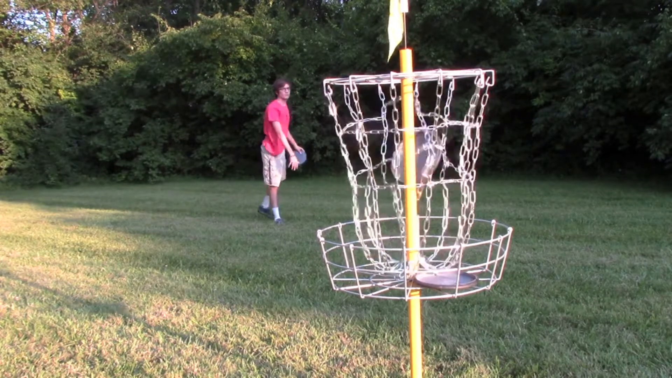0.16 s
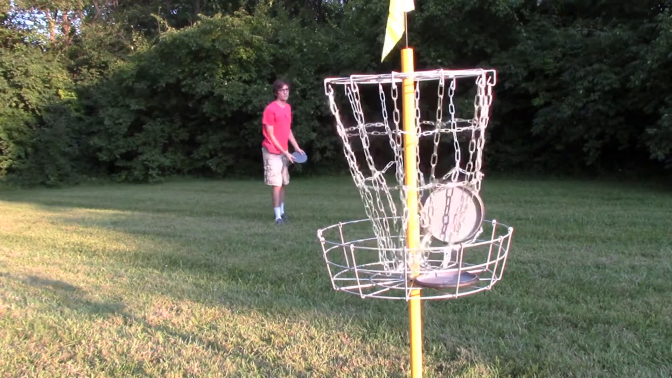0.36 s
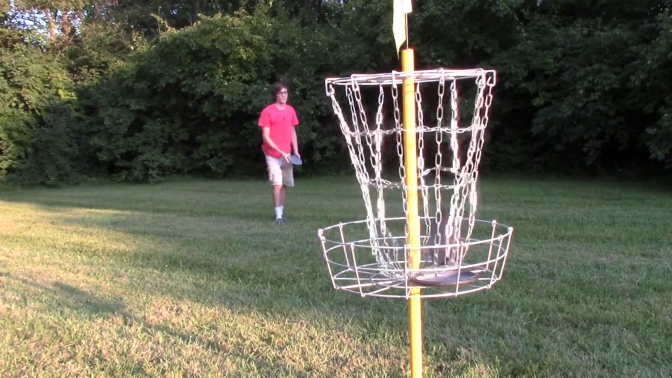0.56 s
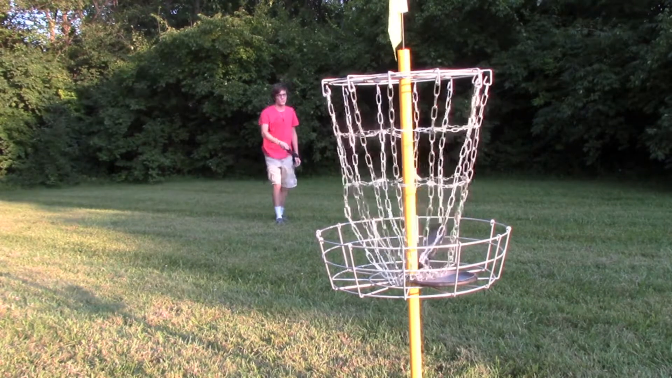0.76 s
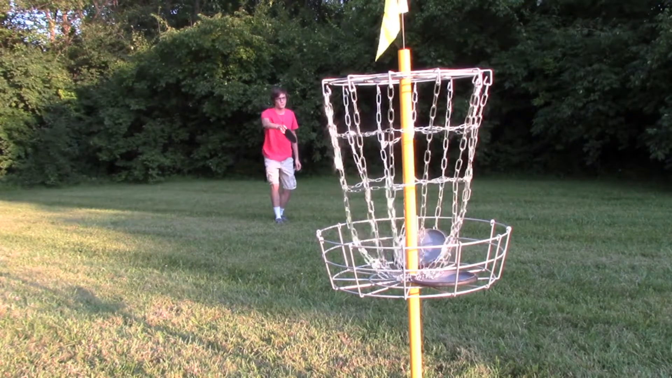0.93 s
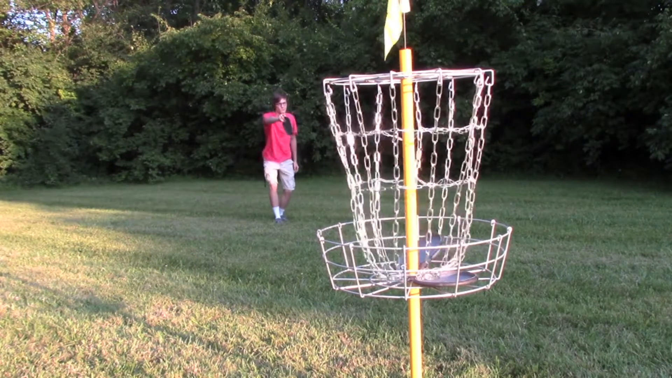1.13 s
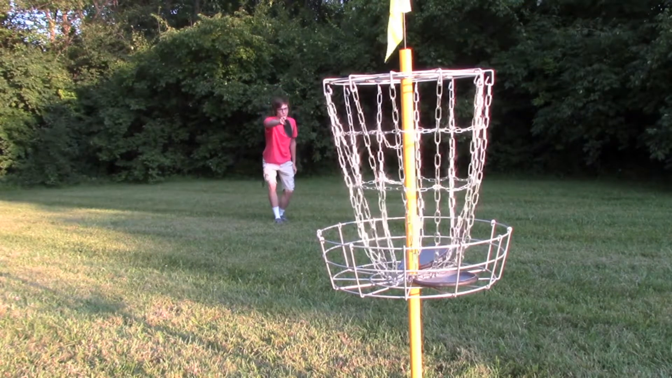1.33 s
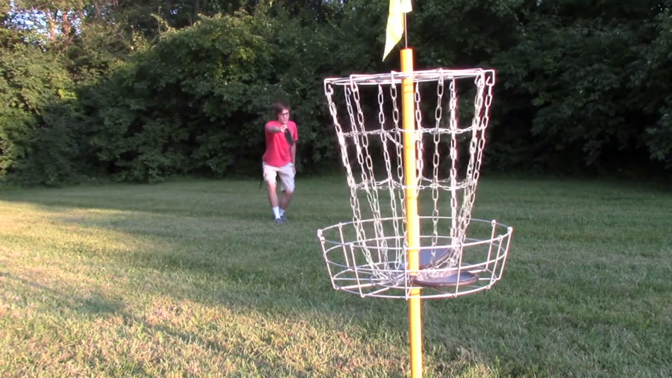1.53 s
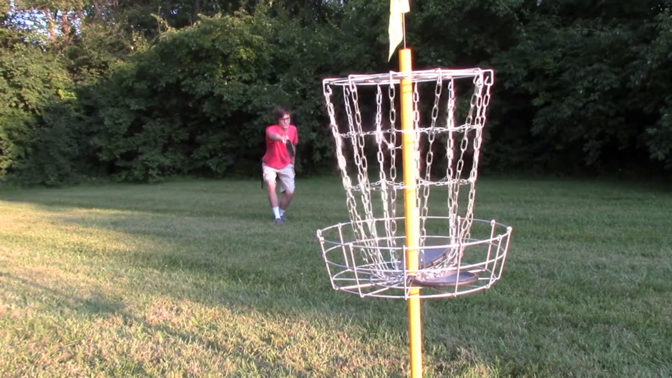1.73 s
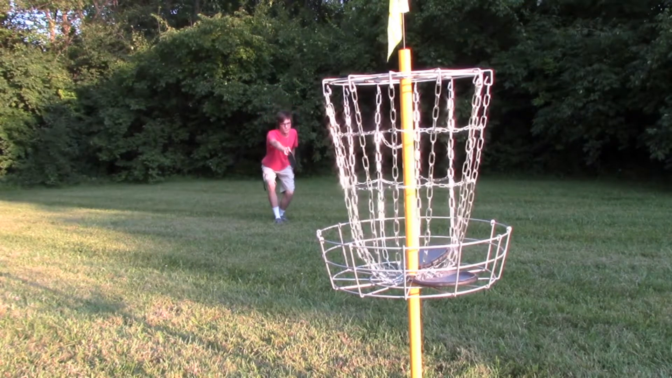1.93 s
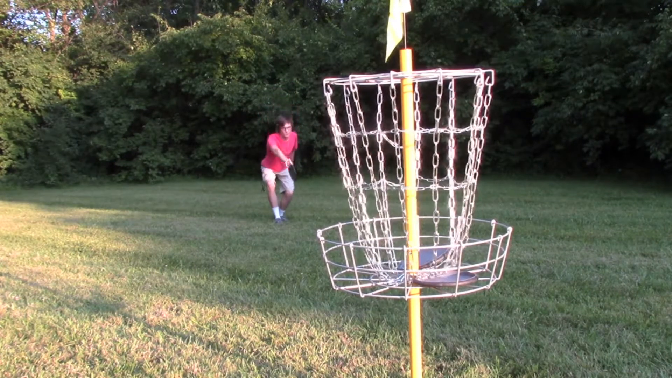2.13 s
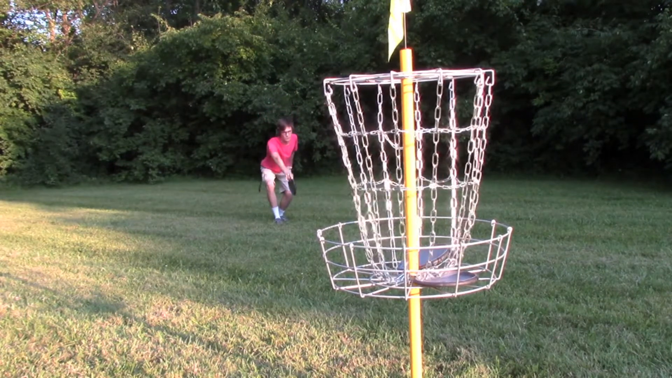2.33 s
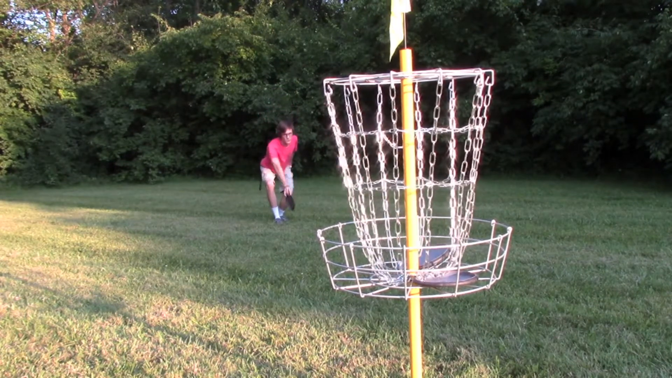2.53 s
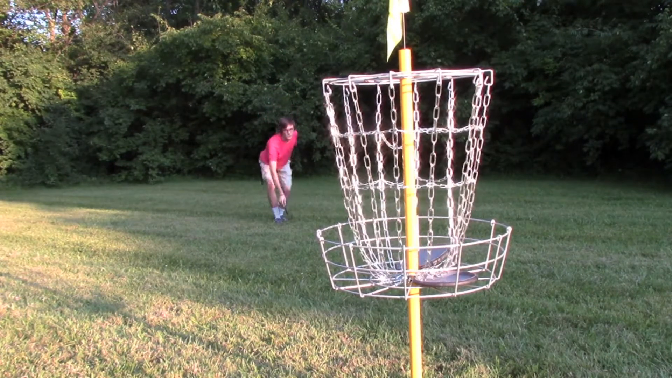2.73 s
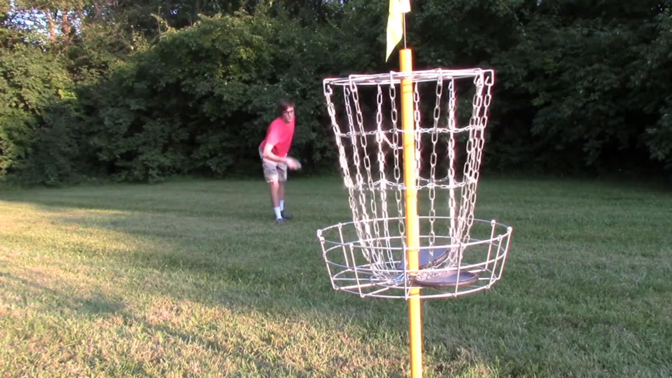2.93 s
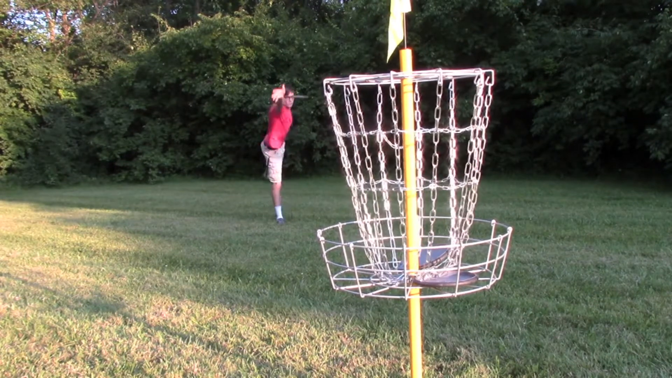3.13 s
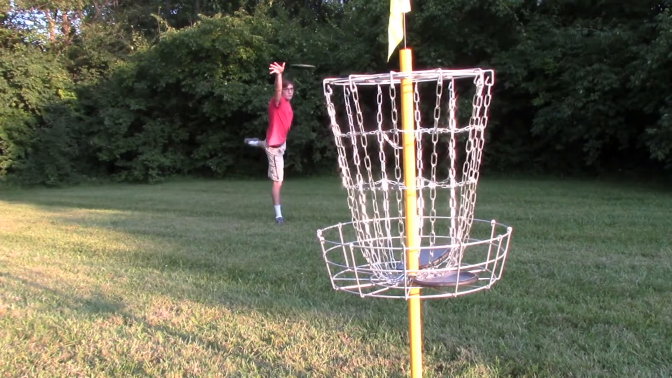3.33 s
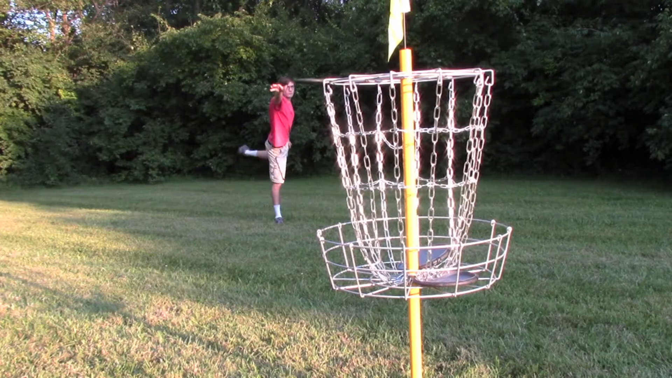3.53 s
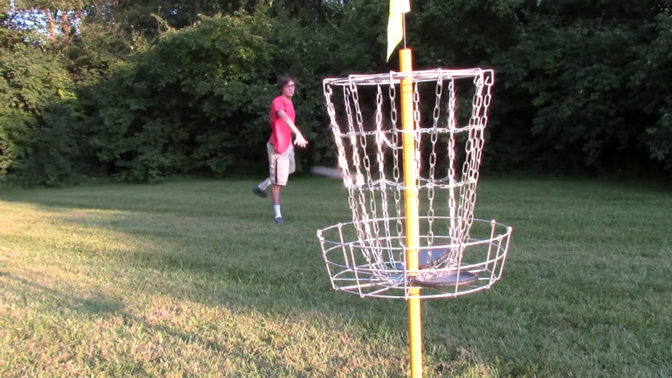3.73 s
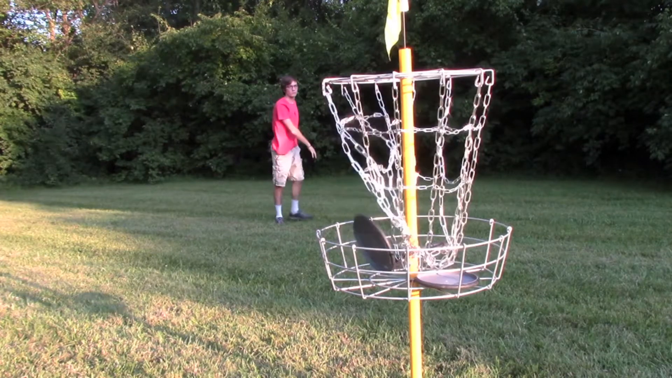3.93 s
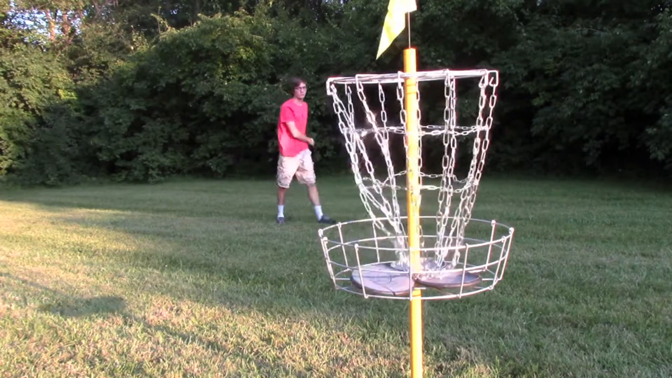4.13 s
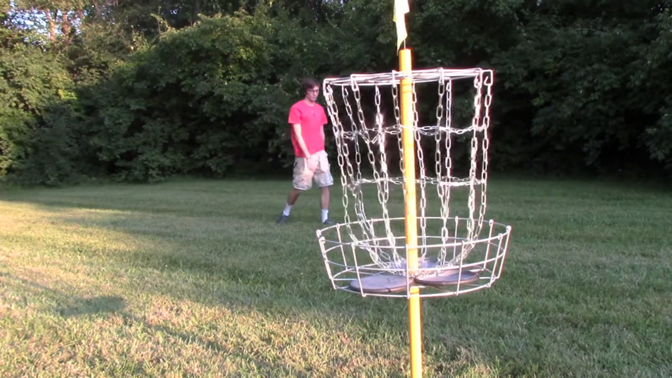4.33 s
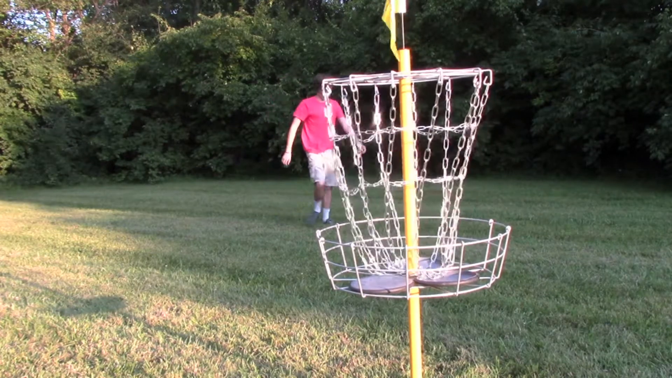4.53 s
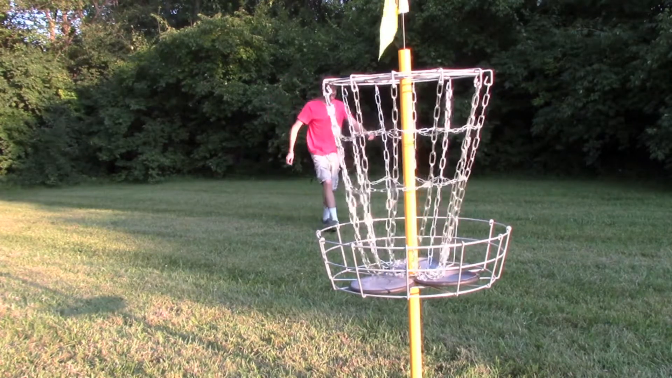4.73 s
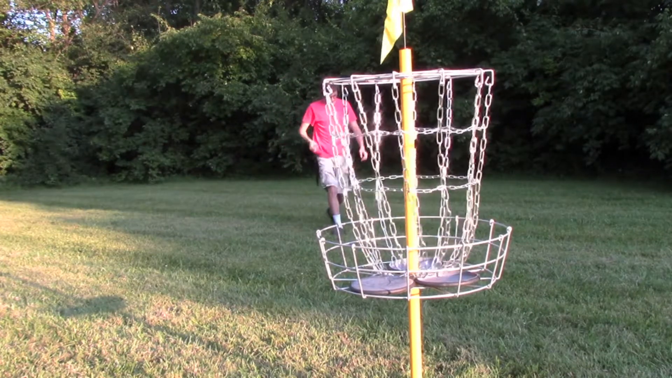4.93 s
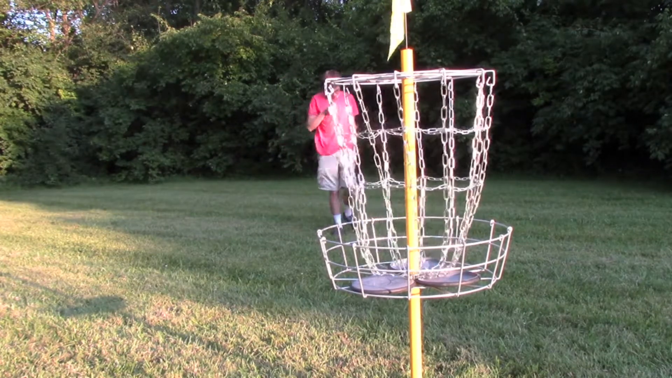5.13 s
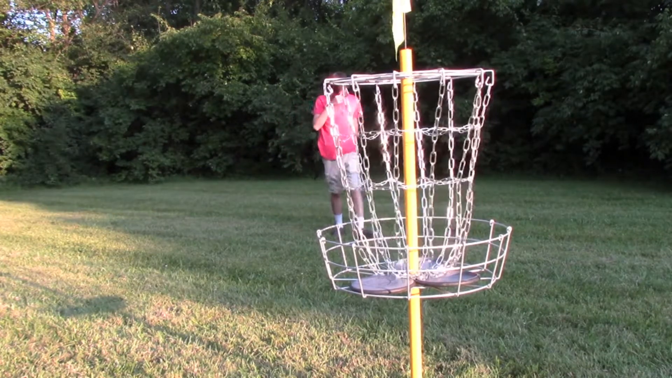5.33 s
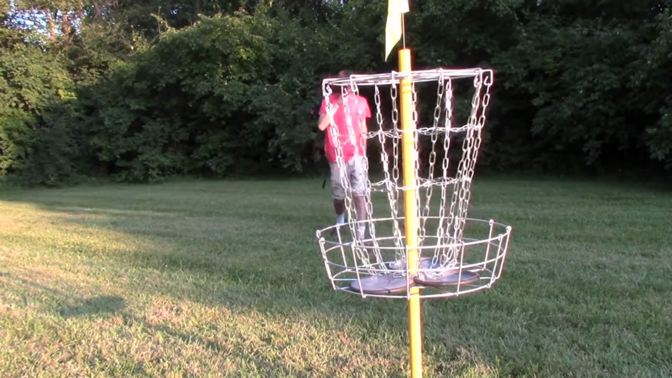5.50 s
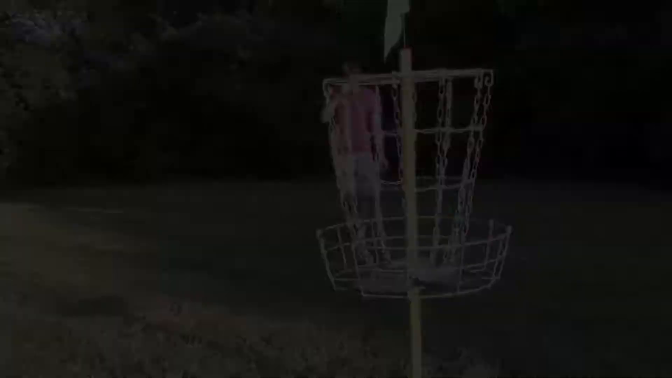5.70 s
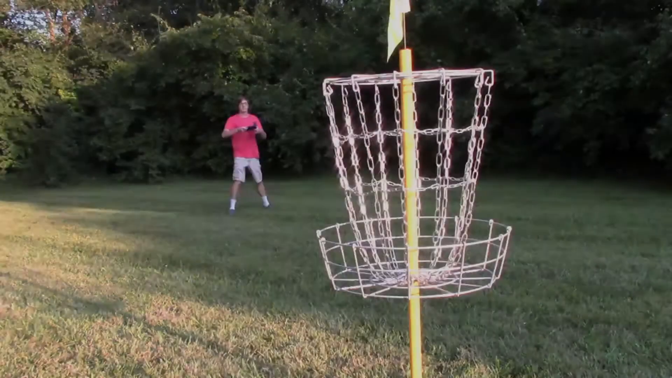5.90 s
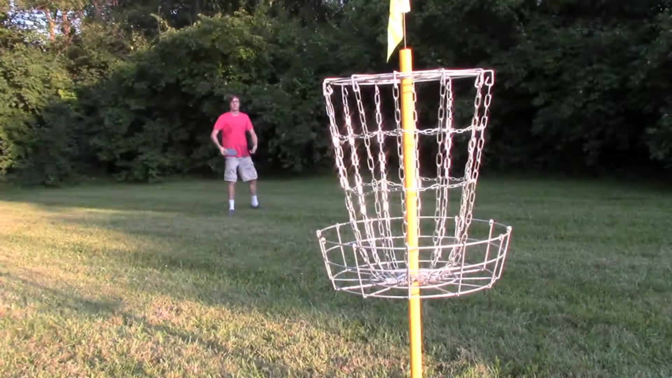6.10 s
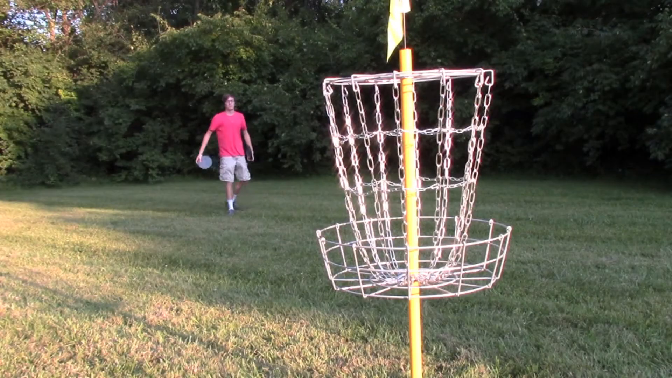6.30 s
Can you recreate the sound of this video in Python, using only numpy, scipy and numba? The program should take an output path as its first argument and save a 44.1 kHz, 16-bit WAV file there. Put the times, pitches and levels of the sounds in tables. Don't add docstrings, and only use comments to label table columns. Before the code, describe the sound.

A plastic disc crashes into hanging steel chains, which ring and clink away; seconds later a second crash follows, over steady insect buzz outdoors.

```python
import sys
import numpy as np
from scipy import signal
from scipy.fft import rfft, irfft
from scipy.io import wavfile
from scipy.ndimage import uniform_filter1d
from numba import njit

SR = 44100
rng = np.random.default_rng(int(sys.argv[2]) if len(sys.argv) > 2 else 0)


def voltage_ratio(decibels):
    exponent = np.asarray(decibels, float) / 20
    return 10 ** exponent


def unload_audio(sound):
    columns = np.transpose(np.atleast_2d(sound))
    steps = np.round(np.clip(columns, -1, 1) * 32767)
    wavfile.write(sys.argv[1], SR, steps.astype(np.int16))


N = 284877
T = np.arange(N) / SR
BOTH, APART = np.array([[1], [1]]), np.array([[1], [-1]])

# (time [s], link peak [dB], hoop middle [dB], hoop high [dB])
CLASH_FIRST = [(0.0578, -11.5, -38.5, -20), (0.1078, -8.5, -26, -13.5), (0.1321, -10.5, -15, -13.5),
               (.1446, -14, -17.5, -8.5), (0.1798, -20, -16, -14.5), (0.217, -10.5, -19.5, -7),
               (0.2542, -21, -16, -14.5), (0.2896, -20.5, -15, -13.5), (0.317, -22, -17, -10),
               (0.344, -18, -15, -20.5), (0.3678, -22.5, -18, -10.5), (0.385, -37, -16, -13.5),
               (0.4348, -17, -16.5, -9.5), (.4614, -25, -19.5, -10.5), (0.49, -21, -18, -18),
               (0.514, -13.5, -12.5, -17), (0.5446, -24.5, -17.5, -19), (0.5845, -9, -20, -24),
               (0.62, -19.5, -23.5, -32), (0.6583, -16.5, -24, -34), (0.6996, -11.5, -31, -45),
               (0.7344, -15, -34, -31), (0.7576, -10, -33, -32), (0.8283, -15.5, -39, -43)]
CLASH_SECOND = [(3.7272, -10.5, -49.5, -49), (3.742, -5, -34, -17), (3.7737, -16.5, -14.5, -5),
                (3.7836, -23.5, -18.5, -12), (3.8007, -28, -17, -12.5), (3.8547, -16.5, -18, -17.5),
                (3.8996, -31.5, -19, -17.5), (3.9498, -31, -26, -17.5), (4.0115, -22, -14, -15.5),
                (4.0293, -20.5, -21, -13), (4.0596, -32, -23, -20), (4.119, -7.5, -23, -12),
                (4.1816, -10, -27, -18.5), (4.209, -12, -32, -41), (4.249, -31, -32, -23),
                (4.3156, -15, -39, -44), (4.3518, -12.5, -38.5, -42), (4.4054, -18, -47, -46),
                (4.5006, -11.5, -23, -23.5), (4.5989, -16.5, -28.5, -31), (4.65, -32.5, -31, -59),
                (4.725, -26, -38, -40.5)]
# (time [s], peak [dB], low modes [dB])
CHAIN_SLAP = [(.725, -14.5, 6.5), (0.883, -19.5, -1), (0.936, -21.5, -4), (0.9867, -21, -9),
              (1.023, -26, 5.5), (1.104, -29.5, 8), (1.1318, -19, -2), (1.1723, -21.5, 2),
              (1.26, -21.5, -5), (1.302, -27, -6), (1.367, -42.5, 11), (1.395, -37, 6), (1.4404, -39, 7),
              (4.465, -28, 1), (4.5822, -29, 0), (4.616, -17, -2), (4.632, -20.5, 2), (4.75, -33, -5),
              (4.7827, -33.5, 0), (4.811, -29, 10.5), (4.8196, -26, 4), (4.8345, -28.5, 10), (4.85, -33, 3),
              (4.866, -31, -8), (4.884, -31.5, 8), (4.9143, -24.5, 6), (4.9201, -18, -4)]
# (time [s], peak [dB])
LOOSE_CLINK = [
    [(1.4675, -22), (1.5, -32), (1.55, -38), (1.6551, -41), (1.7305, -34), (1.768, -31.5), (1.8467, -24.5),
     (1.8981, -37), (1.922, -28), (2.0447, -39), (2.0925, -29.5), (2.1985, -41.5), (2.2229, -30.5),
     (2.2341, -32.5), (2.3441, -34), (2.4094, -44), (2.432, -41), (2.4527, -38), (2.5236, -39),
     (2.632, -52), (2.7325, -44.5), (2.854, -34.5), (2.961, -40), (3.0202, -43)],
    [(4.97, -38), (5.0295, -35), (5.131, -42), (5.1647, -30.5), (5.234, -17.5), (5.3194, -32),
     (5.4118, -41), (5.46, -44), (5.4984, -43), (5.5111, -48), (5.524, -40), (5.5551, -39), (5.568, -47),
     (5.586, -45), (5.5954, -42)],
]
# (time [s], rattle [dB])
CHAIN_SHAKE = [
    [(.057, -18.5), (.249, -25), (.281, -32.5), (.421, -20.5), (.637, -33.5), (.765, -36), (1.083, -42.5),
     (1.16, -37), (1.45, -56)],
    [(3.725, -35.5), (3.76, -30.5), (4.145, -24), (4.347, -31), (4.5, -49.5), (4.631, -45), (4.77, -52),
     (4.85, -44), (5.06, -55)],
]
# (time [s], peak [dB],
# mode [Hz])
FREE_LINK = [(.6986, -38, 8400), (0.757, -24.5, 1590), (0.758, -19, 8400), (.936, -25.5, 8490),
             (1.0236, -32, 8390), (1.1603, -29, 8450), (1.1694, -42, 1520), (1.169, -41, 4360),
             (1.258, -28, 8210), (1.467, -31, 8330), (1.469, -36, 1590), (1.846, -39, 8360),
             (1.923, -41.5, 1720), (1.923, -38, 4400), (1.47, -29.5, 10750), (1.769, -39, 8350),
             (1.847, -47, 4320), (1.846, -51, 1570), (1.9, -53, 10760), (1.923, -51, 10900),
             (2.046, -40, 8300), (2.094, -48, 4420), (2.224, -63, 11000), (2.234, -42, 4470),
             (2.345, -44, 8400), (2.858, -42, 1640), (2.234, -37, 7200), (2.233, -42, 1630),
             (2.8569, -41, 7360), (4.113, -24, 7200), (4.249, -26, 8390), (4.3158, -17.5, 8390),
             (4.349, -13, 8400), (4.4082, -31, 8410), (4.117, -22, 6600), (4.182, -20, 7640),
             (4.462, -37, 10600), (4.619, -27, 8440), (4.726, -42, 12300), (4.726, -40, 7300),
             (4.821, -35, 1540), (4.822, -33, 3500), (4.866, -34.5, 3530), (4.9135, -33, 1607),
             (4.9147, -24, 4490), (4.916, -26, 8280), (5.235, -39, 1544), (2.855, -43, 8300),
             (2.855, -58, 13300), (2.962, -44, 8400), (2.962, -44, 1600), (3.021, -49, 4480),
             (3.021, -56, 13300), (5.03, -45, 10900), (5.165, -37, 8330), (5.236, -41, 7800),
             (5.46, -52, 3740), (5.499, -55, 10900), (5.524, -46.5, 3640), (5.555, -49, 10900),
             (5.596, -44, 10960), (5.596, -49, 14500), (3.726, -18.5, 2650), (3.726, -20.5, 3216),
             (0.059, -18, 2816), (4.501, -27, 2740), (4.501, -34, 4530)]
# (frequency [Hz], level [dB])
LINK_MODES = [(1600, -6), (3740, -3), (4450, -5), (7360, -2), (7760, -2), (8190, -2), (8400, 0), (8850, -4),
              (9750, -5), (10850, -5), (2960, -10), (13300, -8), (13800, -10), (12300, -8)]
# (frequency [Hz], level [dB])
CROWD_COLOUR = [(1300, -13), (2600, -4), (3700, -9), (5000, -11), (8000, -4.5), (11000, -11), (14300, -13),
                (16000, -26.5)]
CROWD_EDGES_HZ = [1000, 2300, 3800, 5500, 7500, 9800, 12500, 16500]
# (time [s], peak [dB], body note [Hz], t60 [s])
DISC_KNOCK = [(0.057, -10, 1040, 0.082), (0.071, -10.5, 960, 0.017), (0.066, -16.5, 476, 0.05),
              (0.095, -11, 865, 0.034), (0.096, -11, 502, 0.063), (.0975, -10, 1400, 0.019),
              (.098, -9.5, 550, 0.032), (0.109, -18, 503, 0.027), (0.142, -24, 835, 0.033),
              (0.216, -22, 1405, 0.052), (0.283, -21, 950, 0.05), (0.315, -20.5, 1200, 0.069),
              (0.321, -22.5, 574, 0.069), (0.346, -15.5, 509, 0.051), (0.376, -20, 900, 0.047),
              (0.389, -21.5, 700, 0.04), (0.419, -17.5, 880, 0.026), (0.513, -14.5, 520, 0.042),
              (0.584, -23, 874, 0.091), (0.739, -26.5, 1490, 0.055), (3.724, -11.5, 1290, 0.059),
              (3.744, -20, 950, 0.043), (3.776, -14.5, 1110, 0.037), (3.798, -21.5, 523, 0.073),
              (3.866, -25.5, 880, 0.081), (3.919, -31, 840, 0.14), (3.949, -30.5, 212, 0.15),
              (3.989, -21, 275, 0.12), (4.039, -27.5, 198, 0.16), (4.029, -16, 685, 0.018),
              (4.057, -21.5, 389, 0.069), (4.074, -29.5, 620, .08), (4.124, -28.5, 873, 0.36),
              (4.209, -28, 517, 0.066), (4.318, -26, 1490, 0.042), (4.499, -32, 820, 0.06),
              (4.6, -29, 966, 0.062)]
# (frequency [Hz], level [dB])
DISC_CLATTER = [(250, -26.0), (450, -7.0), (1000, -2.5), (1800, -3.0), (4000, -5.0), (9000, -42.0)]
# (frequency [Hz], level [dB], t60 [s])
HOOP_LOW_MODES = [(2012, -18, 1.2), (2030, -18, 1.2), (2121, 0, 1.2), (2140, -8, 1.2)]
HOOP_MID_MODES = [(5546, 0, .8), (5567, -4, .8), (5587, -1, .8), (5616, 0, .8), (5648, -5, .7),
                  (5696, -8, .6), (5720, -12, .5)]
HOOP_HIGH_MODES = [(10350, -16, .3), (10660, -12, .35), (10697, -2, .4), (10730, 0, .4), (10765, -3, .4),
                   (10820, -11, .35), (10885, -7, .3), (10973, -13, .3), (11082, -14, .3), (11380, -19, .2),
                   (11600, -19, .2), (11790, -20, .2), (12030, -21, .2)]
# (time [s], level [dB])
WIDE_HOOP_HIT = [(.13, -38.5), (.475, -30), (.512, -26), (.56, -33.5), (.7, -32.5), (.9, -41), (1, -60),
                 (4.15, -38), (4.3, -39), (4.52, -36.5), (4.7, -61)]
# (time [s], lower line [dB], upper line [dB])
SPLIT_HUM = [
    [(.125, -44, -43.5), (.135, -24, -26), (.215, -24.5, -21.5), (.27, -37, -20.5), (.34, -25.5, -26),
     (.46, -28.5, -37.5), (.5, -19, -29), (.54, -18.5, -23.5), (.7, -23, -30)],
    [(3.765, -39, -40), (3.785, -18.5, -30), (3.89, -12, -28), (3.96, -14.5, -36), (4.01, -20.5, -31),
     (4.13, -31, -35), (4.2, -32, -28.5), (4.3, -34, -30.5), (4.45, -33, -35.5)],
]
SPLIT_HZ = 1965.95, 1989.03
SPLIT_FADE_DB_PER_S = 21.5, 17
SPLIT_IN_STEP_S = .891, 4.805
# (time [s], shell [dB], three bending modes [dB], [dB], [dB])
POLE_TOUCH = [(0.0573, -25.5, -33.5, -47, -33), (0.1064, -14, -26, -32, -31),
              (0.1316, -11, -27.5, -30, -33), (.15, -17, -35.5, -39.5, -38.5),
              (0.179, -17, -44, -27.5, -34), (0.2167, -12, -34, -32, -35.5),
              (0.254, -19.5, -30, -36.5, -37.5), (0.2884, -24.5, -31, -38, -40.5),
              (0.316, -17, -27, -36, -38), (0.3436, -14, -27, -32.5, -35.5),
              (0.3834, -11.5, -33.5, -39, -40), (0.4329, -18.5, -25.5, -26, -37),
              (0.461, -19.5, -24, -32.5, -28.5), (0.4883, -22.5, -33.5, -42.5, -34.5),
              (0.5144, -24, -36, -44, -32.5), (0.5444, -16, -28, -30, -31.5),
              (0.5841, -20, -21.5, -30.5, -27.5), (0.6564, -37, -33, -37, -37),
              (0.6928, -27, -25, -41, -49), (0.7304, -34, -32, -32, -39), (0.7564, -30, -31, -44, -43),
              (0.824, -37, -39, -45, -52), (0.9354, -46, -56, -60, -57), (3.7404, -19.5, -31, -35, -28),
              (3.7728, -12.5, -30, -48.5, -34.5), (3.8, -21, -44, -39.5, -43),
              (3.8322, -25.5, -31, -41, -40), (3.8544, -17.5, -33.5, -39, -36),
              (3.8992, -19.5, -44, -39, -44), (3.949, -19, -39.5, -36, -46), (4.0108, -16, -30.5, -31, -32),
              (4.0372, -13.5, -48, -30, -45), (4.0594, -22, -30.5, -30, -48), (4.1154, -14, -27, -30, -33),
              (4.1814, -16.5, -39.5, -35, -37), (4.2084, -19, -28.5, -62, -41),
              (4.2474, -15, -27.5, -34, -38.5), (4.3153, -27, -33, -37, -38),
              (4.5018, -10.5, -17.5, -22.5, -23), (4.6014, -17.5, -31, -41, -40),
              (4.64, -26.5, -40, -44, -48), (4.8187, -26.5, -40, -47, -47)]
# (frequency [Hz], level [dB], t60 [s])
POLE_SHELL = [(5865, -9, .3), (5940, -10, .3), (6040, -9, .4), (6272, -9, .2), (6585, -6, .25),
              (6928, -7, .35), (7365, -9, .25), (7857, -4, .3), (8050, -4, .2), (8395, -6, .25),
              (8985, -7, .2), (9640, -10, .2)]
# (frequency [Hz], level [dB], t60 [s])
POLE_BENDING = [
    [(3386, 0, .4), (3404, -8, .3), (3360, -14, .2), (2369, -11, .25), (2780, -15, .15)],
    [(4124, 0, .45), (4146, -8, .3), (4095, -14, .2), (4450, -15, .15)],
    [(4985, 0, .25), (4960, -8, .2)],
]
# (frequency [Hz], width [Hz], level [dB])
INSECT_BANDS = [(5120, 850, -6.5), (5770, 220, -0.5), (6275, 490, 0.5), (7120, 680, -5.5),
                (7770, 600, -14.5)]
# (frequency [Hz], density [dB/Hz])
RUMBLE_COLOUR = [(24, -54), (50, -17.5), (129, -3), (375, -13.5), (975, -11), (3500, -32.5), (9000, -40),
                 (16000, -48)]
# (time [s], level [dB])
RUMBLE_SWELL = [
    (0, 1.5),
    (1, 4),
    (2, 2.5),
    (3, 1.5),
    (3.7, 0),
    (4.5, 3.5),
    (5.5, 2.5),
    (6.46, 2.5),
]
# (time [s], gain [1])
SCENE_FADE = [
    (5.578, 0.92),
    (5.834, 0.0061),
    (6.08, 0.86),
]
CLINK_LIMITS_S = .05, .22

CLINK_DB, CLINK_T60_S, LONGER_S_PER_DB = -47, 0.31, 1.7
CLINK_LOW_DB, BRIGHTER_DB_PER_DB = 6, 0.31
TAUT_T60_S, TAUT_LOW_DB = 0.17, -2
TICK_DB, TICK_T60_S = -7, .015
EVEN_SHAKE_DB, SHAKE_BRIGHTER_DB_PER_DB, DULLEST_DB = -35.5, 0.86, 3
FREE_T60_S, FREE_SLOPE = 0.11, 0.2


@njit
def ring(start, stop, pole, z0):
    out = np.zeros(N)
    for k in range(len(start)):
        z = z0[k]
        for i in range(start[k], min(stop[k], N)):
            out[i] += z.imag
            z *= pole[k]
    return out


def poles(hz, t60):
    return np.exp((2j * np.pi * np.asarray(hz) - np.log(1000) / t60) / SR)


def samples(s):
    return (s * SR).astype(np.int64)


def impulse_response(s, hz, t60, gain):
    return ring(samples(s), samples(s + t60), poles(hz, t60), gain + 0j)


def bursts(s, db, t60):
    at = samples(s)
    power = ring(at, at + samples(t60), poles(0 * s, t60 / 2), 1j * voltage_ratio(2 * db))
    return np.sqrt(power)


def bandpass(x, lo, hi, order=2):
    return signal.sosfilt(signal.butter(order, [lo, hi], "bandpass", fs=SR, output="sos"), x)


def shaped(points, size=N):
    hz, db = np.transpose(points)
    f = np.fft.rfftfreq(size, 1 / SR) + 1
    colour_db = np.interp(np.log(f), np.log(hz), db)
    x = irfft(rfft(rng.standard_normal(size)) * voltage_ratio(colour_db), size)
    return x / x.std()


def walk(rate):
    k = int(SR / rate)
    held = np.repeat(rng.standard_normal(N // k + 1), k)
    return uniform_filter1d(held, k)[:N]


def struck(modes, s, level_db, scatter_db, trim_db):
    hz, db, t60 = np.transpose(modes)
    count = len(hz)
    pole, at = poles(hz, t60), np.append(samples(s), N)
    chance = rng.standard_normal((len(s), count))
    z, states = np.full(count, 1e-9 + 0j), []
    for k, want in enumerate(np.sqrt(2) * voltage_ratio(level_db + trim_db)):
        fresh = voltage_ratio(db + scatter_db * chance[k]) * np.sign(chance[k])
        z = .75 * z
        missing = np.sqrt(max(want ** 2 - np.linalg.norm(z) ** 2, 0))
        z = z + fresh / np.linalg.norm(fresh) * missing
        z = z * want / np.linalg.norm(z)
        states.append(z)
        z = z * pole ** (at[k + 1] - at[k])
    start, stop = np.repeat(at[:-1], count), np.repeat(at[1:], count)
    out = ring(start, stop, np.tile(pole, len(s)), np.ravel(states))
    return bandpass(out, .96 * hz.min(), 1.04 * hz.max())


def chains():
    s, link_db, _, _ = np.transpose(CLASH_FIRST + CLASH_SECOND)
    clash = [s, link_db, 0 * s + TAUT_LOW_DB]
    taut_s, taut_db, taut_low_db = np.c_[clash, np.transpose(CHAIN_SLAP)]
    loose_s, loose_db = np.vstack(LOOSE_CLINK).T
    harder_db = loose_db - CLINK_DB
    low_db = np.r_[taut_low_db, CLINK_LOW_DB - BRIGHTER_DB_PER_DB * harder_db]
    loose_t60 = np.clip(CLINK_T60_S + LONGER_S_PER_DB * harder_db, *CLINK_LIMITS_S)
    t60 = np.r_[0 * taut_s + TAUT_T60_S, loose_t60]
    hit_s = np.r_[taut_s, loose_s]
    ringing = links(hit_s, np.r_[taut_db + 2.5, loose_db], low_db, t60,
                    count=30, named_db=-9.0, crowd_db=-8, colour_db=1.5)
    ringing = ringing + rattle()
    tick_db = np.r_[taut_db - 3.5, loose_db] + TICK_DB
    return ringing + shaped(CROWD_COLOUR) * bursts(hit_s, tick_db, 0 * t60 + TICK_T60_S)


def links(s, db, low_db, t60, count, named_db, crowd_db, colour_db):
    u = rng.random((len(s), 4, count))
    known = np.array(LINK_MODES)[(u[:, 0] * len(LINK_MODES)).astype(int)]
    hz = known[..., 0] * (1 + .012 * (u[:, 2] - .5))
    gain_db = known[..., 1] + named_db - 8.4 * u[:, 3]
    gain_db = gain_db + db[:, None] + low_db[:, None] * (hz < 5500)
    decay = t60[:, None] * (8000 / hz) ** .1 * (.5 + .7 * u[:, 1])
    gain = voltage_ratio(gain_db) / np.sqrt(count)
    out = impulse_response(np.repeat(s, count), hz.ravel(), decay.ravel(), gain.ravel())
    many = crowd()
    tint_db = colour_db * rng.standard_normal((len(s), len(CROWD_EDGES_HZ) - 1))
    for lo, hi, tint in zip(CROWD_EDGES_HZ, CROWD_EDGES_HZ[1:], tint_db.T):
        band_db = db + crowd_db + tint + low_db * (hi < 6000)
        out = out + bandpass(many, lo, hi) * bursts(s, band_db, t60 * (7000 / hi) ** 0.28)
    return out


def crowd(count=300, width_hz=34.0, peak_db=10.0):
    unnamed_hz = rng.uniform(1400, 15700, count)
    hz = np.r_[np.array(LINK_MODES)[:, 0], np.array(POLE_SHELL)[:, 0], unnamed_hz]
    f = np.arange(1000., 16000, 10)
    resonance = 1 / (1 + ((f[:, None] - hz) / width_hz) ** 2)
    heaps = (rng.exponential(size=len(hz)) * resonance).sum(axis=1)
    colour_hz, colour_db = np.transpose(CROWD_COLOUR)
    colour = np.interp(np.log(f), np.log(colour_hz), colour_db)
    return shaped(np.c_[f, colour + 10 * np.log10(1 + voltage_ratio(2 * peak_db) * heaps)])


def rattle(per_s=800):
    when, size_db = [], []
    for s, db in map(np.transpose, CHAIN_SHAKE):
        duration = s[-1] - s[0]
        at = s[0] + duration * rng.random(int(per_s * duration))
        when.extend(at)
        size_db.extend(np.interp(at, s, db))
    when, size_db = np.array(when), np.array(size_db)
    dull_db = np.minimum(SHAKE_BRIGHTER_DB_PER_DB * (EVEN_SHAKE_DB - size_db), DULLEST_DB)
    size_db = size_db + 2.5 * rng.exponential(size=len(when)) - 1.5
    return links(when, size_db, dull_db, 0 * size_db + 0.054,
                 count=4, named_db=-5.5, crowd_db=-4.5, colour_db=5.5)


def singing():
    s, db, hz = (np.repeat(col, 3) for col in np.transpose(FREE_LINK))
    u = rng.random((len(FREE_LINK), 2, 3))
    neighbour = np.tile([0, 1, 1], len(FREE_LINK))
    hz = hz * (1 + 0.0295 * neighbour * (u[:, 0].ravel() - .5))
    t60 = np.maximum(FREE_T60_S + 0.0045 * (db + 41), .06)
    t60 = t60 * np.minimum(hz / 8400, 8400 / hz) ** FREE_SLOPE
    t60 = t60 * (1 - 0.41 * neighbour * u[:, 1].ravel())
    weaker_db = neighbour * (2.5 + 0.84 * np.maximum(db + 39.5, 0))
    return impulse_response(s, hz, t60, voltage_ratio(db - 3.5 - weaker_db))


def knocks():
    s, db, hz, t60 = np.transpose(DISC_KNOCK)
    u = rng.random((len(s), 2, 8))
    pitch = np.hstack([hz[:, None], 420 * 7.4 ** u[:, 0]])
    part_db = np.hstack([0 * hz[:, None] + 3.0, -2.5 - 19.2 * u[:, 1]])
    gain = voltage_ratio(db[:, None] - 8.5 + part_db)
    decay = 0.81 * t60[:, None] * (700 / pitch) ** .4
    start = np.repeat(s, pitch.shape[1])
    notes = impulse_response(start, pitch.ravel(), decay.ravel(), gain.ravel())
    return notes + shaped(DISC_CLATTER) * bursts(s, db - 5.5, 2.04 * t60)


def hoops():
    s, _, mid_db, high_db = np.transpose(CLASH_FIRST + CLASH_SECOND)
    low = struck(HOOP_LOW_MODES, *np.transpose(WIDE_HOOP_HIT), 3, -3)
    middle = struck(HOOP_MID_MODES, s, mid_db, 4, 2.6)
    high = struck(HOOP_HIGH_MODES, s, high_db, 3, -1.5)
    return low + middle + high


def hum():
    out = 0
    for (s, *dbs), together in zip(map(np.transpose, SPLIT_HUM), SPLIT_IN_STEP_S):
        left_alone_s = np.maximum(T - s[-1], 0)
        for hz, db, fade_db in zip(SPLIT_HZ, dbs, SPLIT_FADE_DB_PER_S):
            gain = voltage_ratio(np.interp(T, s, db) - fade_db * left_alone_s) * (T > s[0])
            out = out + gain * np.sin(2 * np.pi * hz * (T - together))
    return out


def pole_tube():
    s, shell_db, *bending_db = np.transpose(POLE_TOUCH)
    out = struck(POLE_SHELL, s, shell_db, 3.9, -5.0)
    for modes, db, trim_db in zip(POLE_BENDING, bending_db, (1.5, -0.5, -1.5)):
        out = out + struck(modes, s, db, 1.8, trim_db) * voltage_ratio(1.0 * walk(30))
    return out


def basket():
    steel = hoops() + pole_tube() + chains() + singing() + knocks()
    return signal.sosfilt(signal.butter(3, 230, "highpass", fs=SR, output="sos"), steel)


def bushes(steel):
    size = SR // 4
    tail = rng.standard_normal((2, size)) * np.exp(-np.arange(size) / (0.029 * SR))
    return signal.fftconvolve(steel[None], tail / np.linalg.norm(tail[0]), axes=1)[:, :N]


def insects():
    out = 0
    for hz, width, db in INSECT_BANDS:
        clicks = rng.standard_normal(N) * voltage_ratio(1.0 * walk(300))
        band = bandpass(clicks, hz - width / 2, hz + width / 2, 3)
        out = out + band / band.std() * np.sqrt(width / 500) * voltage_ratio(db + 1.2 * walk(4.5))
    return out / out.std()


def rumble():
    noise = BOTH * shaped(RUMBLE_COLOUR) + APART * voltage_ratio(-19.5) * shaped(RUMBLE_COLOUR)
    swell_db = np.interp(T, *np.transpose(RUMBLE_SWELL)) + 1.5 * walk(4.026)
    return noise * voltage_ratio(-46.5 + swell_db)


def scene():
    background = rumble()
    background = background + (BOTH * insects() + APART * voltage_ratio(-11.0) * insects()) * voltage_ratio(-47.5)
    steel, pair = basket(), hum()
    echo = bushes(steel)
    side = voltage_ratio(-17) * np.gradient(np.gradient(echo[1])) + voltage_ratio(-31) * echo[1]
    side = side + voltage_ratio(-34) * np.gradient(pair) / np.sin(2 * np.pi * SPLIT_HZ[0] / SR)
    middle = steel + voltage_ratio(-6.0) * echo[0] + pair
    return BOTH * middle + APART * side + background


def top_cut(x):
    return signal.sosfilt(signal.butter(12, 16810, fs=SR, output="sos"), x)


def record(dry):
    rounded = dry / (1 + (dry / .85) ** 6) ** (1 / 6)
    limited = signal.sosfilt(signal.ellip(8, .3, 50, 15700, fs=SR, output="sos"), rounded)
    mix = limited * np.interp(T, *np.transpose(SCENE_FADE))
    return top_cut(mix)


dry = scene()
out = record(dry)
unload_audio(out)
```